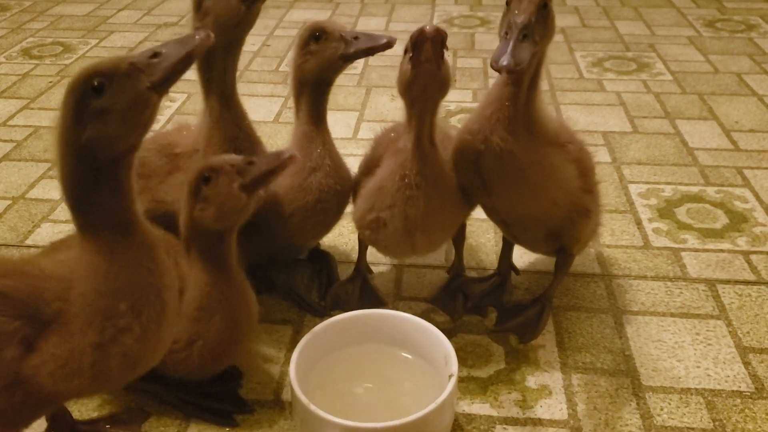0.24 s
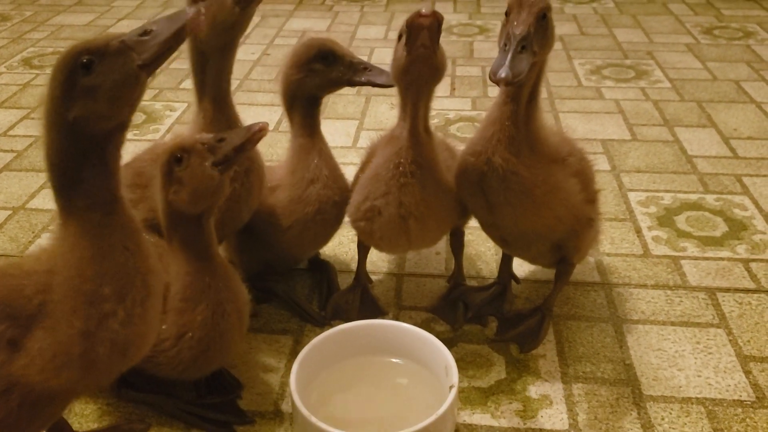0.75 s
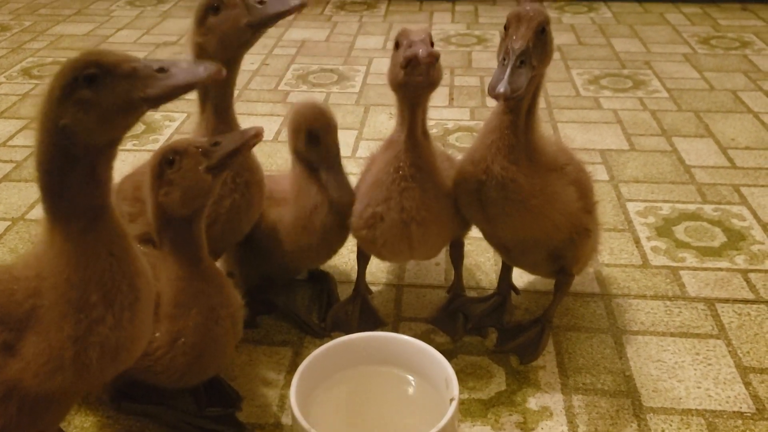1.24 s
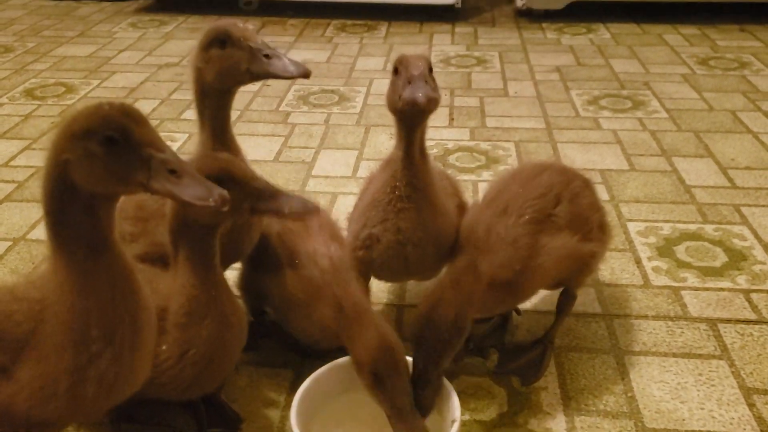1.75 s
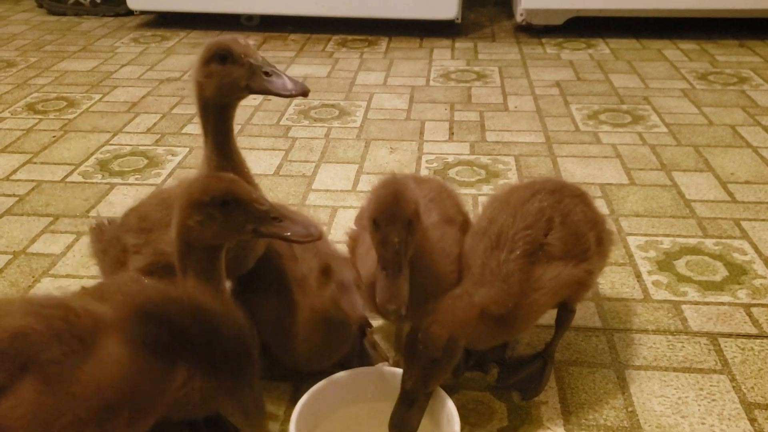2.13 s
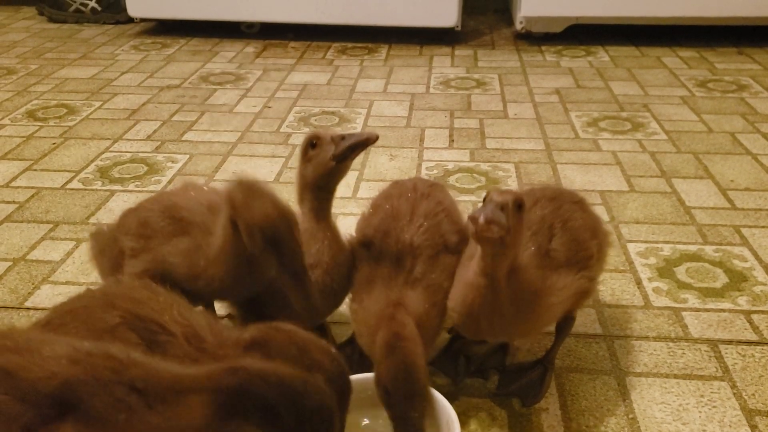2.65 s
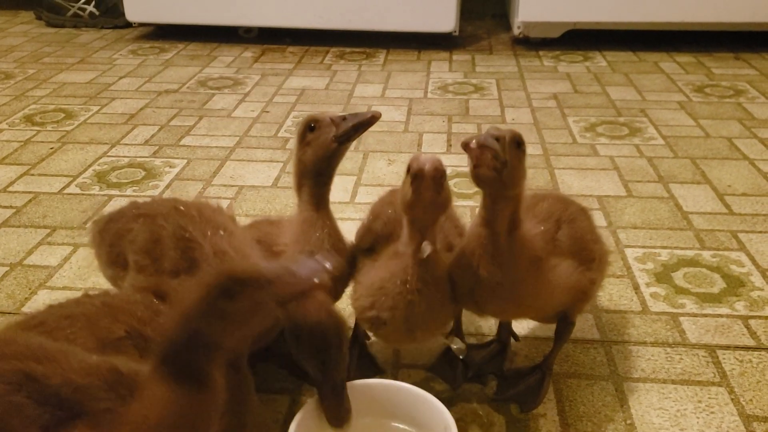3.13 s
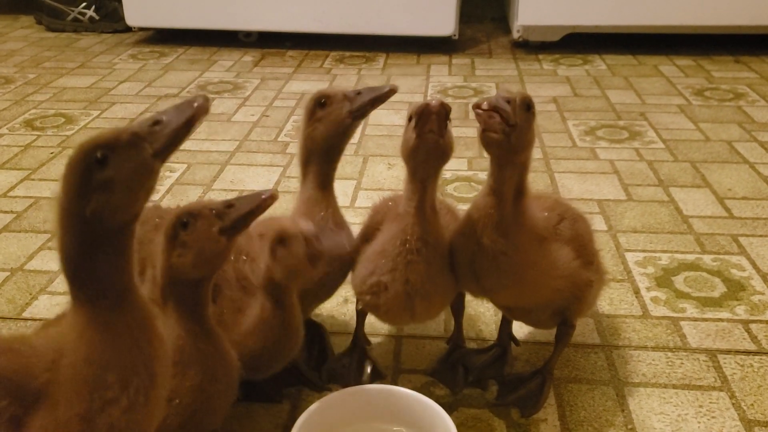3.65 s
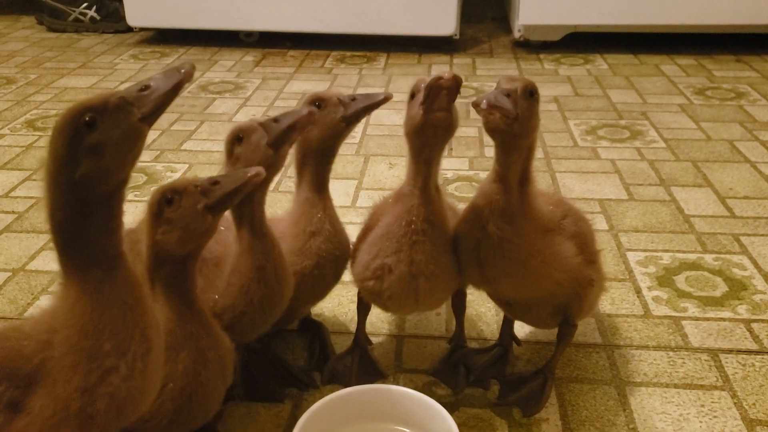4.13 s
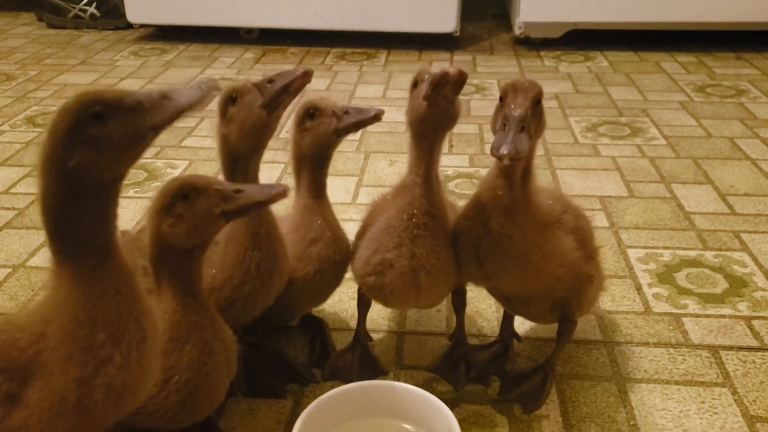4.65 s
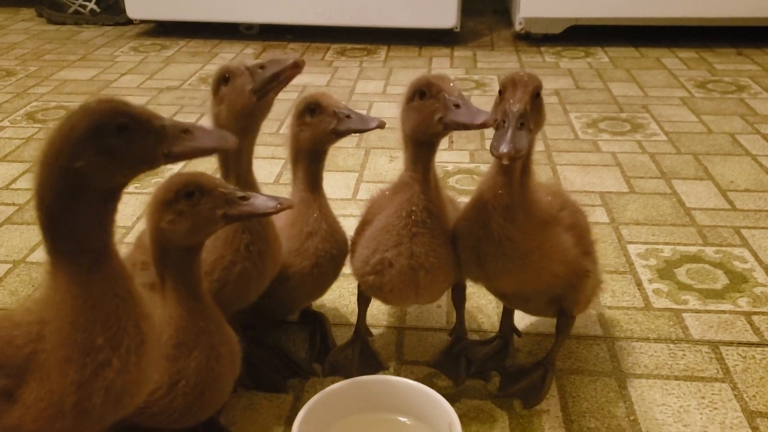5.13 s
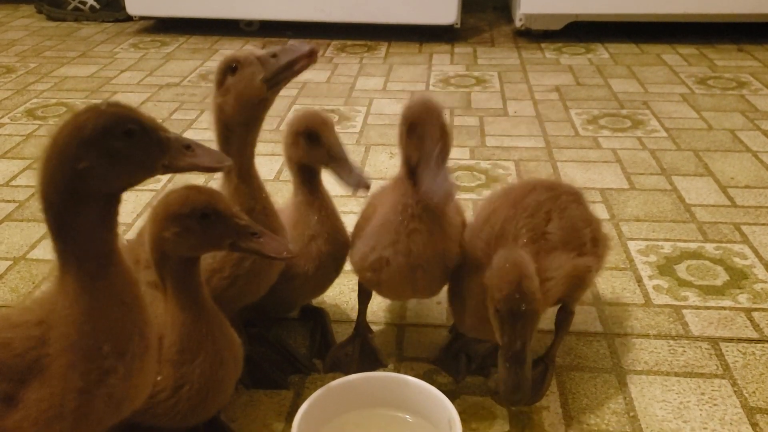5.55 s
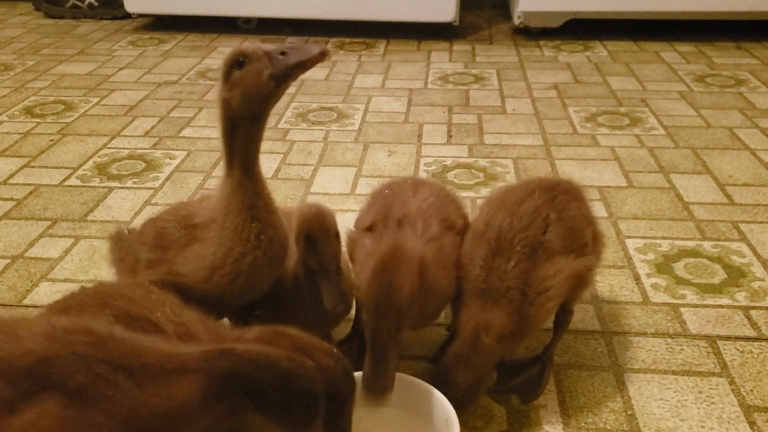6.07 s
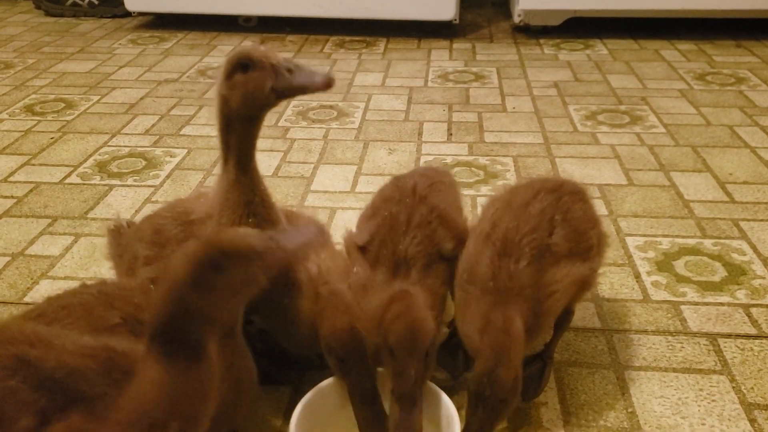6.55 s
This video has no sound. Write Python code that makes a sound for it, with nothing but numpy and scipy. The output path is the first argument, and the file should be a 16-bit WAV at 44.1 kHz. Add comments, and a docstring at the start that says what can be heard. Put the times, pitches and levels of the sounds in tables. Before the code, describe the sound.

Several ducklings crowd a water bowl in a small hard kitchen, heard very close in stereo. Fine wet nibbling opens, then wavering clear peeps start, one beginning with a low croak. Sharp bill snaps, slurps and bubble pops cluster near three seconds, ease into a quiet spell, then return with fresh peeps and the busiest splashing at the end. A faint rush and low throb lie beneath.

```python
"""Ducklings crowd round a water bowl on a kitchen floor, close to a pair of microphones.
They peep in wavering, nearly pure whistles with faint overtones, rasps and one low croak.
Wet bills crackle, smack and sip, bubbles pop, down hisses, and webbed feet thud and shuffle in filtered noise.
The small hard room answers whistles and water with a decaying noise tail.
Underneath lie a steady rush and a faint, regular low throb of noise."""
import sys
import numpy as np
from scipy import signal
from scipy.fft import rfft, irfft, next_fast_len
from scipy.io import wavfile
from scipy.ndimage import map_coordinates

SR = 44100
rng = np.random.default_rng(int(sys.argv[2]) if len(sys.argv) > 2 else 0)


def materialize(psi):
    """Save the field psi as 16-bit PCM at rate SR to the path in sys.argv[1].

    A 1-D psi becomes a single channel; in a 2-D psi each row is a channel.
    """
    bounded = np.clip(np.atleast_2d(psi).T, -1, 1)
    quanta = np.round(bounded * 32767).astype(np.int16)
    wavfile.write(sys.argv[1], SR, quanta)


N = 299880  # length in samples


def amp(db):
    """Decibels to gain."""
    return 10 ** (np.asarray(db) / 20)


def unit(x):
    """Scale to rms 1."""
    return x / np.sqrt(np.mean(x ** 2) + 1e-20)


def along(points, hz):
    """Rows of (Hz, value) read on a log frequency axis."""
    f, v = np.transpose(points)
    return np.interp(np.log(hz + 1), np.log(f + 1), v)


def wobble(rate):
    """A smooth random curve, rate knots a second."""
    knots = rng.standard_normal(int(N * rate / SR) + 4)
    return map_coordinates(knots, [np.arange(N) * rate / SR])


def filtered(x, response):
    """x times a complex response of frequency."""
    m = next_fast_len(N + SR // 2)
    return irfft(rfft(x, m) * response(np.fft.rfftfreq(m, 1 / SR)), m)[..., :N]


def causal(points, size=1024):
    """The minimum-phase impulse response with the given spectrum, by folding its cepstrum."""
    cepstrum = irfft(np.log(amp(along(points, np.fft.rfftfreq(size, 1 / SR)))))
    cepstrum[1:size // 2] *= 2
    cepstrum[size // 2 + 1:] = 0
    return irfft(np.exp(rfft(cepstrum)))


def panned(lean_db):
    """Left and right gains for a level difference; positive leans left."""
    return amp(np.array([[.5], [-.5]]) * lean_db)


def add(track, s, sound):
    """Mix a sound into the track at time s."""
    start = min(max(round(s * SR), 0), N)
    track[..., start:start + sound.shape[-1]] += sound[..., :N - start]


# Likeness of the two microphones. Each row: frequency in Hz, left-right correlation.
LIKENESS = [(60, 0.8), (240, 0.95), (500, 0.59), (2000, 0.25), (4000, 0.29), (7500, 0.05), (13000, 0.16)]
# Balance of the two microphones. Each row: frequency in Hz, left over right in dB.
BALANCE = [(60, -1), (110, -3), (200, -2), (380, 1), (700, 2), (1290, -1.5), (2380, -18), (4400, 3.5),
           (8120, 4.5), (15000, 0)]
# Head start at the left microphone. Each row: frequency in Hz, phase lead in radians.
LEFT_LEAD = [(100, 0), (350, 0), (2000, 1.4), (4000, 2.8), (6500, 3), (9000, .8), (15000, .3)]


def spread(pair, spectrum):
    """Two unrelated signals become one coloured sound at the microphone pair, of rms 1."""
    def turn(hz):
        return np.arccos(np.clip(along(LIKENESS, hz), -1, 1)) / 2

    def mid_side(hz):
        return amp(along(spectrum, hz)) * [np.cos(turn(hz)), np.sin(turn(hz))]

    def microphones(hz):
        return panned(along(BALANCE, hz)) * np.exp(np.array([[.5j], [-.5j]]) * along(LEFT_LEAD, hz))

    mid, side = filtered(pair, mid_side)
    return unit(filtered(np.array([mid + side, mid - side]), microphones))


def crackle(count, scatter_db, hiss, low_hz=1500, high_hz=16000, cycles=1.64):
    """Tiny bursting films of unequal size ring about one cycle at their own pitch, on a soft hiss."""
    when, pitch, size, side = rng.random((count, 4)).T[..., None]
    sample = np.arange(SR // 400)
    hz = low_hz * (high_hz / low_hz) ** np.sqrt(pitch)
    turns = hz * sample / SR
    strength = amp(-scatter_db * np.log(np.maximum(size, .03))) * np.sqrt(hz)
    grains = strength * np.exp(-turns / cycles) * np.sin(2 * np.pi * turns)
    place = ((when * (N - len(sample))).astype(int) + sample).ravel()
    shares = np.cos(2 * np.pi * side), np.sin(2 * np.pi * side)
    pair = [np.bincount(place, (grains * share).ravel(), N) for share in shares]
    return unit(np.array(pair)) + hiss * rng.standard_normal((2, N))


def swells(rows):
    """An envelope of short rounded bursts."""
    t = np.arange(N) / SR
    return sum(amp(db) * np.sqrt(np.abs(np.sin(np.pi * np.clip((t - s) / length, 0, 1))))
               for s, length, db in rows)


def bouts(rows, rise_s, fade_s):
    """An envelope of spells of activity that rise, hold and die away."""
    t = np.arange(N) / SR
    return np.max([amp(db) * np.clip((t - s) / rise_s + .5, 0, 1)
                   * np.exp(-np.maximum(t - s - length, 0) / fade_s)
                   for s, length, db in rows], axis=0)


# The steady rush in the room. Each row: frequency in Hz, relative level in dB.
RUSH_SPECTRUM = [(15, -44), (25, -2.5), (70, 10), (175, -7.5), (236, -2), (531, -21), (1040, -22.5),
                 (2050, -1.5), (2760, -28.5), (3820, -3), (5140, -19), (7110, -7.5), (8360, -25),
                 (11900, -10), (16000, -18)]


def rush(level_db=-58.5):
    """Steady coloured noise lies under everything."""
    return amp(level_db) * spread(rng.standard_normal((2, N)), RUSH_SPECTRUM)


# Colour of the throb. Each row: frequency in Hz, relative level in dB.
THROB_SPECTRUM = [(80, -25), (170, -5.5), (250, 3.5), (390, -7.5), (520, -14.5), (800, -15), (1500, -36.5)]
THROB_PERIOD_S, THROB_PEAK_S = 0.2, 0.155  # spacing of the swells, time of one crest
THROB_DB, THROB_DEPTH_DB = -63.5, 17  # mean level at the crests, and the fall between them


def throb(uneven_db=4.5):
    """A soft low noise swells five times a second, as from an appliance running nearby."""
    trough = np.sin(np.pi * (np.arange(N) / SR - THROB_PEAK_S) / THROB_PERIOD_S) ** 2
    level = amp(THROB_DB - THROB_DEPTH_DB * trough + uneven_db * wobble(4.83))
    return level * spread(rng.standard_normal((2, N)), THROB_SPECTRUM)


# Bouts of dabbling in the bowl and smacking with raised bills.
# Each row: start in seconds, length in seconds, relative level in dB.
DABBLING_BOUTS = [(0, .45, -58.5), (0.544, 0.27, -60), (1.026, 0.79, -58), (1.878, .2, -51),
                  (2.56, 0.18, -56), (2.73, 0.24, -51.5), (3.272, 0.24, -58.5), (3.549, .3, -66.5),
                  (3.893, 0.3, -63), (4.303, .85, -64.5), (5.993, 0.33, -54.5), (6.407, 0.43, -51.5)]
# Colour of the nibbling at the bowl. Each row: frequency in Hz, relative level in dB.
FIZZ_SPECTRUM = [(350, -49), (600, -30), (790, -7), (1070, -16.5), (1430, -12.5), (1960, -3.5), (2500, -16),
                 (2760, -17.5), (3210, -9.5), (3940, -7.5), (5400, -17.5), (7110, -7.5), (8390, -21),
                 (11800, -6.5), (16000, -28)]
# Slurps in the bowl. Each row: start in seconds, length in seconds, level in dB.
SLURP_TIMES = [(1.89, 0.067, -40), (2.76, 0.058, -42), (6.266, 0.049, -36.5), (6.40, 0.051, -50),
               (6.481, 0.014, -48), (6.67, 0.019, -33.5), (6.734, 0.0079, -30.5)]
# Colour of the slurps. Each row: frequency in Hz, relative level in dB.
SLURP_SPECTRUM = [(410, -55), (700, -48), (1200, -17.5), (1920, -2), (2560, -31), (2960, -13.5),
                  (3740, -16.5), (4490, -12.5), (6480, -17.5), (7200, -7.5), (9350, -34), (13700, -10),
                  (16000, -16)]
# Water sucked through a narrow gap of the bill.
# Each row: start in seconds, length in seconds, pitch in Hz, relative level in dB.
SIP_TIMES = [(0.339, 0.017, 7260, -48.5), (0.527, 0.12, 4160, -65.5), (1.201, 0.0072, 4660, -48),
             (1.562, 0.016, 4080, -53), (1.739, 0.022, 4120, -55), (1.896, 0.0036, 4315, -49),
             (2.765, 0.011, 4170, -41), (5.01, 0.027, 3930, -61.5), (6.736, 0.013, 7250, -43)]
BOUT_RISE_S, BOUT_FADE_S = 0.015, 0.24  # whole ramp, decay constant


def dabbling(fizz_db=1, nibble_db=3.0, sip_width=0.099):
    """Wet bills nibble and strain water: fine crackle, denser slurps in the bowl and thin sips."""
    level = bouts(DABBLING_BOUTS, BOUT_RISE_S, BOUT_FADE_S) * amp(fizz_db + nibble_db * wobble(32))
    flow = level * amp(nibble_db * wobble(60))  # the bills chatter many times a second
    out = flow * spread(crackle(count=5000, scatter_db=3.0, hiss=1.0), FIZZ_SPECTRUM)
    slurp = spread(crackle(count=14000, scatter_db=4.0, hiss=0.083), SLURP_SPECTRUM)
    out += swells(SLURP_TIMES) * slurp
    for s, length, hz, db in SIP_TIMES:
        t = np.arange(0, length, 1 / SR)
        turbulence = wobble(sip_width * hz * 2)[:len(t)]
        sip = np.sin(np.pi * t / length) * 2 * turbulence * np.sin(2 * np.pi * hz * t)
        add(out, s, amp(db) * panned(3.1) * sip)
    return out


# The louder wet bill snaps and drops close to the microphones.
# Each row: time in seconds, relative tick peak in dB, relative knock peak in dB, strongest pitch in Hz.
LOUD_SNAPS = [(0.415, -29, -25, 11000), (1.052, -33, -17, 12400), (1.8976, -23.5, -6.5, 5060),
              (1.9236, -23.5, -7, 13200), (2.0621, -19.5, -30, 7600), (2.092, -23.5, -14, 13700),
              (2.1374, -26.5, -22, 5400), (2.6613, -32.5, -11, 15500), (2.7092, -26.5, -6, 7100),
              (2.7378, -21.5, -16, 7560), (2.7706, -28, -24, 3900), (2.8367, -16, -24, 11550),
              (2.8921, -18, -48, 12340), (2.9283, -34, -1.5, 12900), (3.025, -29.5, -11, 12600),
              (3.0553, -39, -27, 2960), (3.078, -32, -11, 13400), (3.357, -20, -6.5, 12100),
              (3.3616, -26.5, -19, 3550), (3.4038, -32.5, -3.5, 5660), (3.467, -31.5, -10.5, 12200),
              (3.479, -32, -4.5, 7500), (4.723, -32.5, -19, 11200), (5.988, -31, -2, 3630),
              (6.0478, -41, -1, 3930), (6.206, -35, 1, 7260), (6.25, -11.5, -21, 13200),
              (6.2903, -22.5, -21, 6460), (6.2983, -23, -33, 14200), (6.4012, -29.5, -6, 5130),
              (6.4128, -34, 1.5, 6595), (6.4884, -27, 0.5, 7500), (6.5561, -43, 10, 6000),
              (6.562, -14.5, -26, 11800), (6.676, -23.5, -16, 2900), (6.6806, -22.5, -35, 6900),
              (6.7351, -37, 8.5, 7200), (6.783, -27.5, -10, 14700)]
SMACKS_PER_S, SMACK_KNOCK_DB, SMACK_HZ = 8, -17, 7960  # SMACK_HZ is the middle pitch
SMACK_DB, SMACK_FOLLOWS = -8, 0.5  # middle peak: this offset plus this share of the bout's level


def smacks(scatter_db=3, pitch_spread=0.5):
    """Small snaps fall at random through each bout, stronger in louder bouts; rows as in LOUD_SNAPS."""
    rows = []
    for s, length, db in DABBLING_BOUTS:
        for when, size, pitch in rng.random((round(SMACKS_PER_S * length), 3)):
            peak_db = SMACK_DB + SMACK_FOLLOWS * db + scatter_db * (2 * size - 1)
            hz = SMACK_HZ * np.exp(pitch_spread * (2 * pitch - 1))
            rows.append((s + when * length, peak_db, SMACK_KNOCK_DB, hz))
    return rows


# Colour of each tick. Each row: frequency in Hz, relative level in dB.
TICK_SPECTRUM = [(1500, -66), (4000, -12), (5500, -16), (7200, 2.5), (8700, -10.5), (12300, 13.5),
                 (16000, 6.5)]
# Resonances of bill and bowl. Each row: middle frequency in Hz, width in Hz, relative level in dB.
KNOCK_MODES = [(1940, 130, -2), (2006, 98, 31), (2630, 85, 16.5), (3870, 180, -57.5)]


def snaps(tick_db=1, knock_db=-2, tick_t60=0.0019, spatter_db=-30, spatter_t60=0.085, rise=0.00051,
          lead=.008, ring=0.8, ring_width_hz=1000, apart=0.83):
    """A water film stretches and bursts with a tick, a tiny ring and spatter; the bill knocks with it."""
    out, t = np.zeros((2, N)), np.arange(SR // 16) / SR
    colour = causal(TICK_SPECTRUM)
    after = np.maximum(t - lead, 0)
    envelope = np.exp(np.minimum(t - lead, 0) / rise) * amp(-60 * after / tick_t60)
    envelope += amp(spatter_db - 60 * after / spatter_t60) * np.minimum(t / lead, 1) ** 2

    def mode(hz, width):
        return width * np.exp(-np.pi * width * t) * np.sin(2 * np.pi * hz * t)

    for s, db, rel_db, hz in LOUD_SNAPS + smacks():
        common, own = rng.choice([-1, 1], (2, len(t))) * envelope
        burst = common + np.array([[apart], [-apart]]) * own
        # each knock lands on slightly different resonances
        body = sum(amp(level) * mode(centre * (1 + 0.057 * rng.standard_normal()), width)
                   for centre, width, level in KNOCK_MODES)
        tick, film, knock = (signal.fftconvolve(burst, response[None], axes=1)[:, :len(t)]
                             for response in (colour, mode(hz, ring_width_hz), body))
        tick = unit(tick) + ring * unit(np.gradient(film, axis=1))
        add(out, s - lead, amp(db + tick_db) * tick / np.abs(tick.mean(axis=0)).max())
        add(out, s - lead, amp(db + rel_db + knock_db) * panned(-4.5) * knock / np.abs(knock).max())
    return out


# Downy bodies brushing past each other. Each row: start in seconds, length in seconds, level in dB.
RUSTLE_TIMES = [(.18, 0.3, -56), (4.87, 0.12, -58), (5.22, 0.28, -52.5)]
# Colour of rubbing down. Each row: frequency in Hz, relative level in dB.
DOWN_SPECTRUM = [(350, -27), (800, 0.5), (1300, -11), (2000, -4), (5000, -2.5), (7200, 2), (8600, -5),
                 (11500, 5.5), (16000, -5.5)]


def rustles():
    """Countless soft fibres rub at once: a smooth, bright hiss."""
    return swells(RUSTLE_TIMES) * spread(rng.standard_normal((2, N)), DOWN_SPECTRUM)


# The birds jostle round the bowl. Each row: start in seconds, length in seconds, relative level in dB.
JOSTLING = [(.25, 0.03, -52.5), (.72, 0.025, -58.5), (1.62, 0.59, -60), (2.76, 0.68, -63),
            (5.15, 0.88, -59), (6.0, 0.95, -53)]
# Colour of feet on the floor. Each row: frequency in Hz, relative level in dB.
SHUFFLE_SPECTRUM = [(41, -41), (70, -5), (163, -3.5), (209, 2.5), (278, -6), (417, -9), (492, -16.5),
                    (1090, -22), (1200, -25), (1560, -25.5), (2640, -120)]
# Footfalls and bumps on the floor. Each row: time in seconds, relative level in dB, pitch in Hz.
FOOTFALLS = [(0.309, -38, 229), (0.348, -45.5, 215), (1.924, -38.5, 220), (2.75, -23, 317.7),
             (2.883, -31.5, 316), (3.111, -42, 97), (3.923, -39, 203), (5.141, -39.5, 98), (5.223, -46, 75),
             (5.99, -24, 206), (6.75, -34.5, 224)]
TREAD_RISE_S, TREAD_FADE_S = 0.071, 0.099  # whole ramp, decay constant


def feet(shuffle_db=-2, step_db=-5, t60=0.11, attack=0.0028, slap=0.2, scuff_db=-19,
         scuff_rise_s=0.0068, scuff_fade_s=0.058):
    """Webbed feet shuffle, and fall with a soft thud and a scuff on the floor covering."""
    now = np.arange(N) / SR
    scuffs = sum(amp(db + scuff_db) * np.exp(np.minimum((now - s) / scuff_rise_s, (s - now) / scuff_fade_s))
                 for s, db, hz in FOOTFALLS)
    jostle = amp(shuffle_db) * bouts(JOSTLING, TREAD_RISE_S, TREAD_FADE_S)
    level = np.hypot(jostle, scuffs) * amp(0.77 * wobble(25))
    out = level * spread(rng.standard_normal((2, N)), SHUFFLE_SPECTRUM)
    t = np.arange(SR // 4) / SR
    patter = unit(filtered(rng.standard_normal(N), lambda hz: amp(along(SHUFFLE_SPECTRUM, hz))))
    for s, db, hz in FOOTFALLS:
        thud = np.sin(2 * np.pi * hz * t) + slap * np.roll(patter, -round(s * SR))[:len(t)]
        add(out, s, amp(db + step_db - 60 * t / t60) * (1 - np.exp(-t / attack)) * thud)
    return out


# Small air bubbles popping in the bowl.
# Each row: time in seconds, starting pitch in Hz, relative level in dB.
BUBBLE_POPS = [(.8, 1940, -48.5), (2.368, 2050, -39.5), (2.5855, 1940, -38), (3.057, 2700, -36.5),
               (3.154, 1850, -35), (3.256, 2167, -34.5), (6.283, 1740, -30), (6.471, 1380, -31.5),
               (6.556, 1600, -28.5), (6.739, 2830, -28)]


def bubbles(t60=0.01, attack=0.00047, climb=12):
    """Each bubble rings for a moment, rising in pitch as it reaches the surface."""
    out, t = np.zeros((2, N)), np.arange(SR // 40) / SR
    for s, hz, db in BUBBLE_POPS:
        ring = np.sin(2 * np.pi * hz * t * (1 + climb * t)) * (1 - np.exp(-t / attack))
        add(out, s, amp(db - 60 * t / t60) * panned(-14) * ring)
    return out


REST_HZ = 1497  # pitch at which the whistle starts and stops
SAG_S = 0.15  # the pitch sags toward rest when pushes lie this far apart


def contour(t, start, end, crests, top_hz):
    """Pitch arches up from rest, sags between pushes (nearer the weaker one) and drops back to rest."""
    height = np.maximum(top_hz - REST_HZ, 1)
    gap, before, after = np.diff(crests), height[:-1], height[1:]
    dips = crests[:-1] + gap * before ** 2 / (before ** 2 + after ** 2)
    sagged = np.minimum(before, after) * np.exp(-(gap / SAG_S) ** 2)
    order = np.argsort(np.r_[crests, dips])
    times, heights = np.r_[crests, dips][order], np.r_[height, sagged][order]
    turn = np.interp(t, times, np.arange(len(times)))
    eased = np.floor(turn) + np.sin(np.pi / 2 * (turn % 1)) ** 2
    arch = np.interp(eased, np.arange(len(times)), heights)
    rise = np.interp(t, [start, crests[0]], [1, 0])
    fall = np.interp(t, [crests[-1], end], [0, 1])
    return REST_HZ + arch * (1 - rise ** 2) * (1 - fall ** 2)


# Hoarse rasps in the throat. Each row: start in seconds, length in seconds, relative level in dB.
RASP_TIMES = [(1.632, 0.02, -42.5), (1.66, 0.13, -58), (2.108, 0.042, -52), (2.238, 0.036, -40.5),
              (2.758, 0.021, -39), (3.262, 0.024, -52), (3.602, 0.082, -53), (5.872, 0.045, -44)]
# Peeps close to the microphones. Each row: start in seconds, end in seconds, overtones in dB,
# shading of the direct path by other birds in dB, and the pushes of breath,
# each with its time in seconds, top pitch in Hz and effort in dB.
PEEP_CALLS = [ (.893, 1.161, -7, -2.5, [(.93, 2176, -21.5), (.99, 2233, -25.5), (1.05, 2350, -27),
              (1.13, 2443, -22.5)]), (1.255, 1.522, 0.5, 1.5, [(1.284, 1882, -31), (1.383, 2099, -28.5),
              (1.497, 2033, -26)]), (1.627, 1.846, 0, -6, [(1.688, 2520, -25.5), (1.762, 2361, -29),
              (1.825, 1780, -31)]), (1.868, 1.936, 0.5, -2, [(1.9, 2000, -27)]),
              (2.107, 2.146, -12, -2.5, [(2.13, 1580, -28)]), (2.224, 2.28, -16, -4, [(2.254, 2843, -19.5),
              (2.268, 2750, -24)]), (2.775, 2.83, -2, 7, [(2.797, 1760, -38)]),
              (3.263, 3.289, -12, 3.5, [(3.284, 4300, -41.5)]), (3.594, 3.69, -21, -6, [(3.625, 1986, -40),
              (3.672, 1890, -43.5)]), (5.572, 5.636, 1.5, -2.5, [(5.606, 2010, -21)]),
              (5.64, 5.787, -2, -3.5, [(5.672, 1849, -34), (5.73, 2000, -46.5), (5.754, 1992, -27.5)]),
              (5.859, 5.926, -18, -1.5, [(5.881, 2700, -17), (5.895, 2900, -38.5)]),
              (5.947, 6.148, -1.5, 1.5, [(5.98, 1957, -25.5), (6.03, 2062, -27), (6.115, 2101, -26)]),
              (6.396, 6.46, -10, -2.5, [(6.408, 2230, -38), (6.448, 2230, -45)]),
              (6.586, 6.657, -18, 1, [(6.628, 1939, -26)])]
# Overtones of the whistle. Each row: multiple of the pitch, relative level in dB.
OVERTONE_LEVELS = [(2, -35.5), (3, -43), (4, -55.5), (5, -57.5), (6, -63.5), (7, -76)]
# The whistle is loudest when its pitch crosses a resonance. Each row: pitch in Hz, gain in dB.
RESONANCE_GAIN = [(1500, -16.5), (1700, -10.5), (1850, -4), (2050, 2.5), (2200, -1.5), (2400, -6.5),
                  (2620, -23), (2850, -5.5)]
PEEP_ATTACK_S, PEEP_RELEASE_S = 0.012, 0.01


def peeps(jitter=0.00444, hoarse=0.026, full_rasp_db=-53, flutter_db=0.37, overtone_flutter_db=3.5, tire_db=3):
    """The syrinx whistles a nearly pure tone; returns it, its direct part and its faint overtones."""
    pitch, size, direct, bright = np.zeros((4, N))
    for start, end, bright_db, shade_db, pushes in PEEP_CALLS:
        crests, top_hz, effort_db = np.transpose(pushes)
        t = np.arange(start, end, 1 / SR)
        hz = contour(t, start, end, crests, top_hz)
        effort = np.interp(t, np.r_[crests, end], np.r_[effort_db, effort_db[-1] - tire_db])
        level = amp(effort + along(RESONANCE_GAIN, hz))
        fade = np.clip(np.minimum((t - start) / PEEP_ATTACK_S, (end - t) / PEEP_RELEASE_S), 0, 1)
        add(pitch, start, hz)
        add(size, start, level * fade)
        add(direct, start, level * fade * amp(shade_db))
        # overtones swell less than the tone itself
        add(bright, start, np.sqrt(level) * fade * amp(bright_db))
    # a rasp shakes the pitch
    shake = hoarse * np.tanh(swells(RASP_TIMES) / amp(full_rasp_db)) * wobble(900)
    waver = jitter * wobble(350) + shake
    phase = 2 * np.pi * np.cumsum(pitch * (1 + waver)) / SR
    tone = np.sqrt(2) * amp(flutter_db * wobble(160)) * np.sin(phase)
    overtones = sum(amp(db + overtone_flutter_db * wobble(70)) * np.sin(k * phase)
                    for k, db in OVERTONE_LEVELS)
    return size * tone, direct * tone, bright * overtones


def croak(s=1.628, length=0.0342, start_hz=350, end_hz=500, db=-42, overtone_db=-12, rough=0.3):
    """One peep starts on a low, rising croak."""
    out, t = np.zeros(N), np.arange(0, length, 1 / SR)
    phase = 2 * np.pi * np.cumsum(start_hz + (end_hz - start_hz) * t / length) / SR
    buzz = np.sin(phase) + amp(overtone_db) * sum(np.sin(k * phase) for k in range(2, 7))
    roughness = 1 + rough * wobble(710)[:len(t)]
    add(out, s, amp(db) * np.sin(np.pi * t / length) * buzz * roughness)
    return out


# Colour of the throat noise. Each row: frequency in Hz, relative level in dB.
RASP_SPECTRUM = [(900, -23), (1600, -4), (2900, -6.5), (3500, -6), (5000, -16.5), (7000, -12.5),
                 (15000, -44.5)]


def rasps(rasp_db=-1):
    """Hoarse breath in the throat: short rounded bursts of coloured noise."""
    return amp(rasp_db) * swells(RASP_TIMES) * spread(rng.standard_normal((2, N)), RASP_SPECTRUM)


# Reverberation of the small hard room. Each row: frequency in Hz, time to fall by 60 dB in seconds.
KITCHEN_T60 = [(200, 0.68), (2000, 0.42), (6000, 0.28), (14000, 0.021)]


def kitchen(x, gap=0.0044):
    """Hard walls answer each microphone differently, after a gap in seconds; the treble dies first."""
    hz, t, z = signal.stft(rng.standard_normal((2, SR // 2)), SR, nperseg=256)
    decay = amp(-60 * t / along(KITCHEN_T60, hz)[:, None])
    tail = signal.istft(z * decay, SR, nperseg=256)[1]
    tail = np.pad(tail / np.linalg.norm(tail[0]), ((0, 0), (round(gap * SR), 0)))
    return signal.fftconvolve(x[None], tail, axes=1)[:, :N]


def scene(left_db=-17, right_db=1.0, lead=0.000092, peep_room_db=-16, water_room_db=-12,
          room_lean_db=-4, overtone_lean_db=4.5):
    """Whistles reach the left microphone first (lead in seconds) but are far stronger at the right."""
    whistle, direct, overtones = peeps()
    rasp = rasps()
    voices = direct * amp([[left_db], [right_db]]) + overtones * panned(overtone_lean_db)
    voices = filtered(voices, lambda hz: np.exp(np.array([[1j], [-1j]]) * np.pi * hz * lead)) + rasp
    near = dabbling() + rustles() + snaps() + bubbles() + croak()
    to_walls = whistle + 0.97 * overtones + 1.93 * rasp[1]
    peep_room = amp(peep_room_db) * panned(room_lean_db) * kitchen(to_walls)
    water_room = amp(water_room_db) * kitchen(near.mean(axis=0))
    return voices + near + feet() + peep_room + water_room + rush() + throb()


TOP_HZ = 16000


def record(dry):
    """Nothing at or above the band limit is kept."""
    return filtered(dry, lambda hz: hz < TOP_HZ)


dry = scene()
out = record(dry)
materialize(out)
```